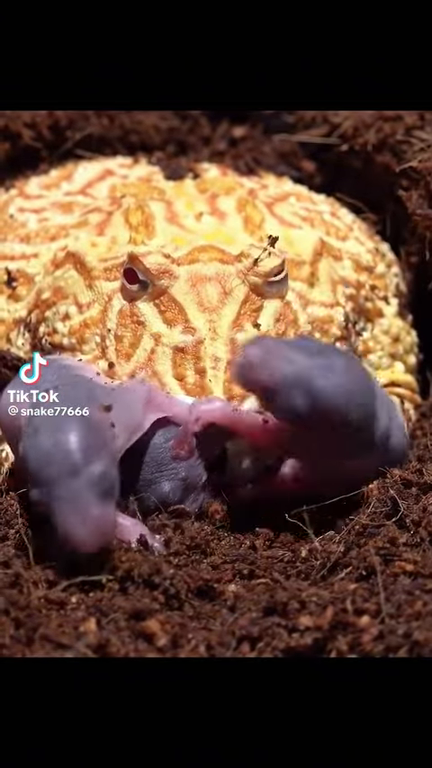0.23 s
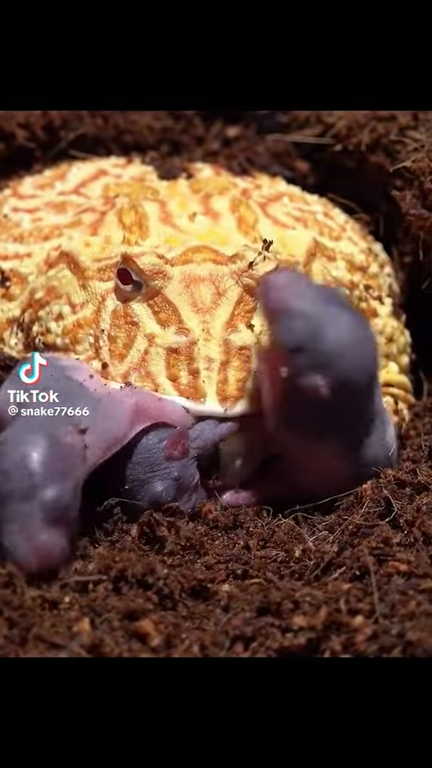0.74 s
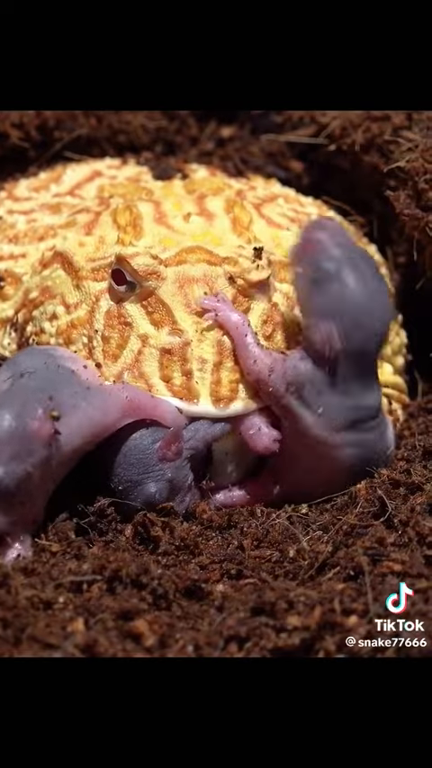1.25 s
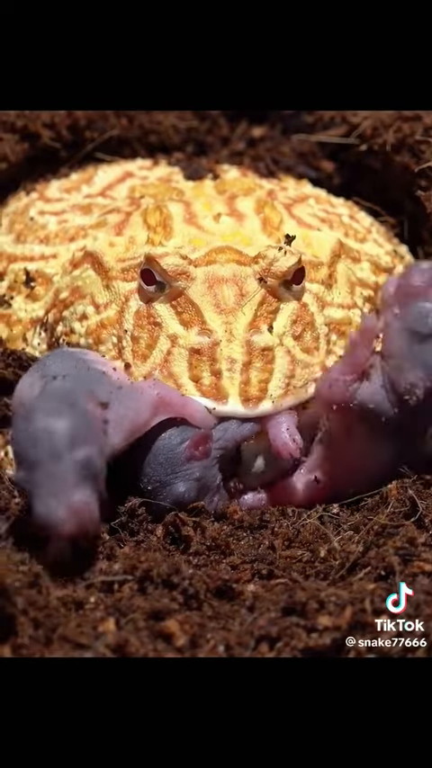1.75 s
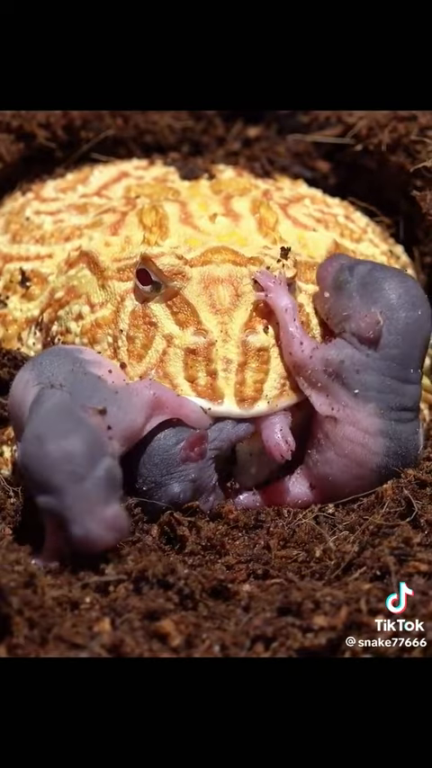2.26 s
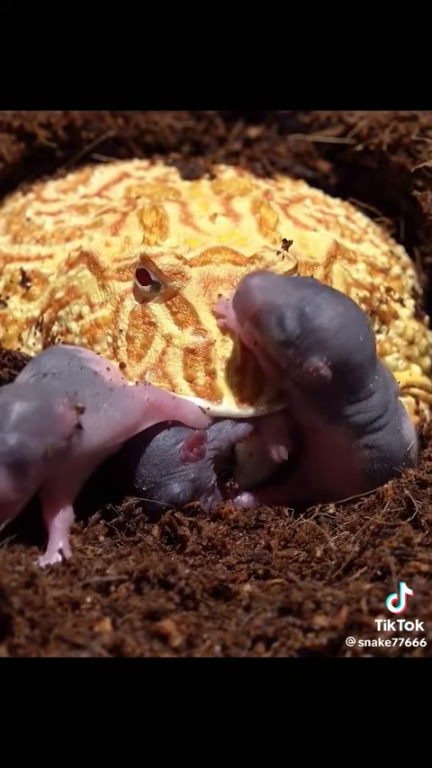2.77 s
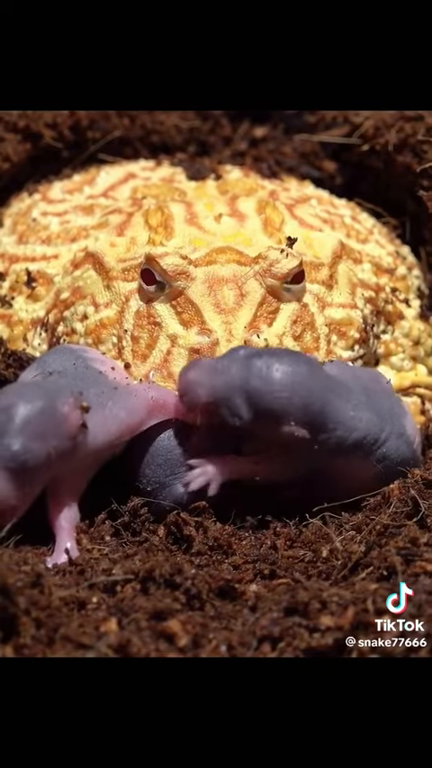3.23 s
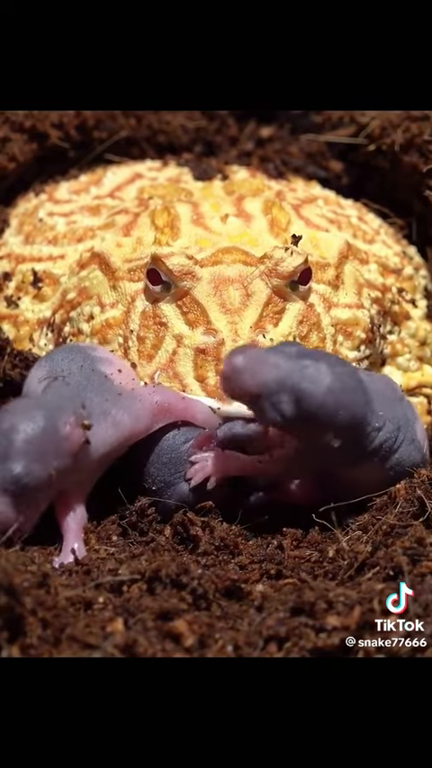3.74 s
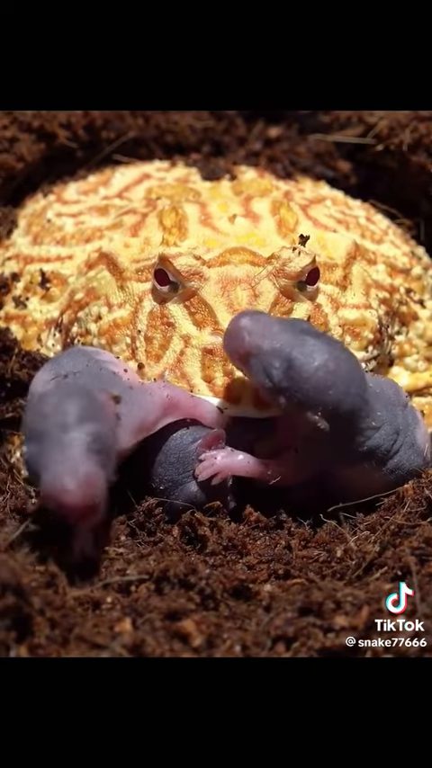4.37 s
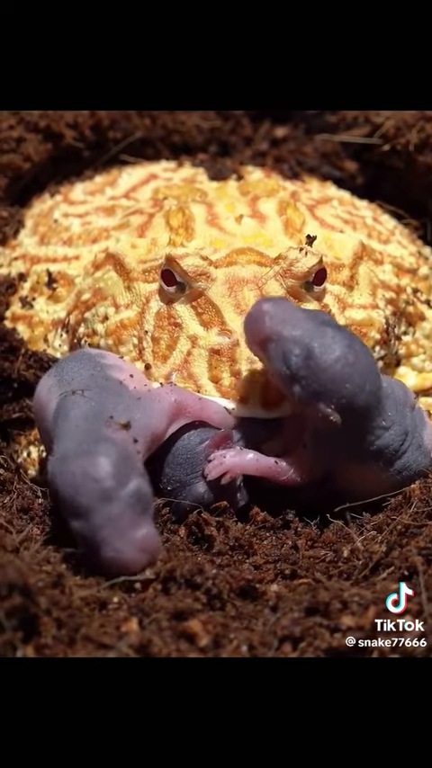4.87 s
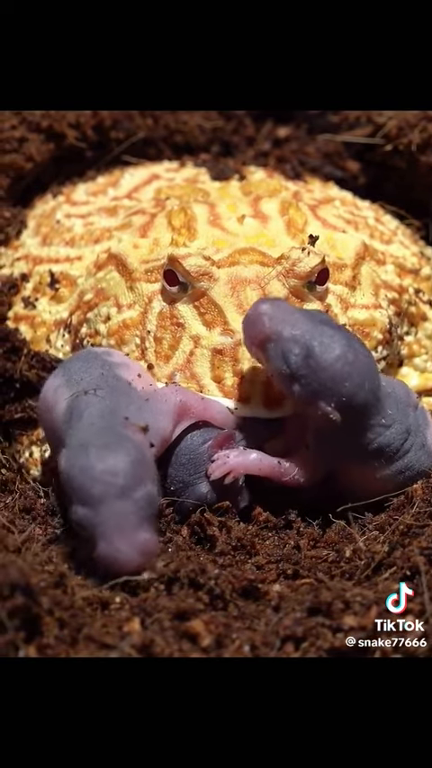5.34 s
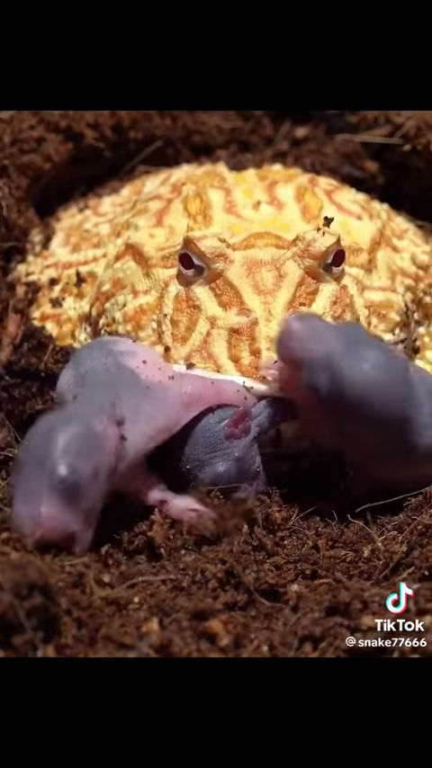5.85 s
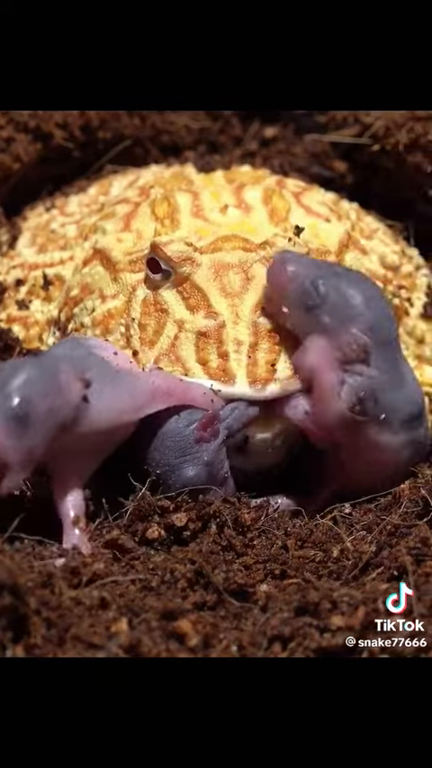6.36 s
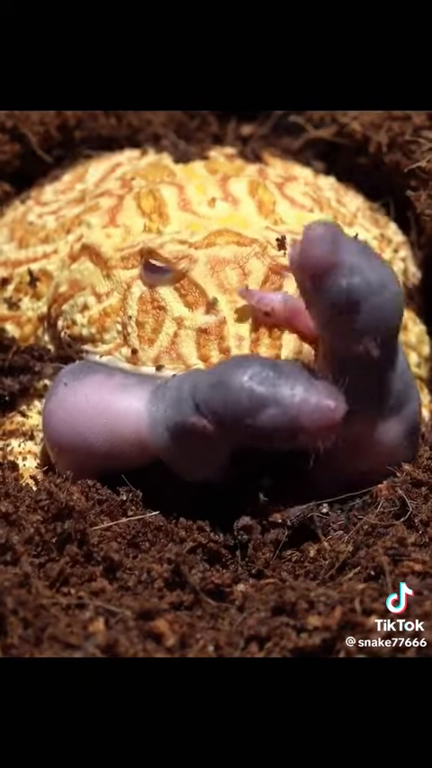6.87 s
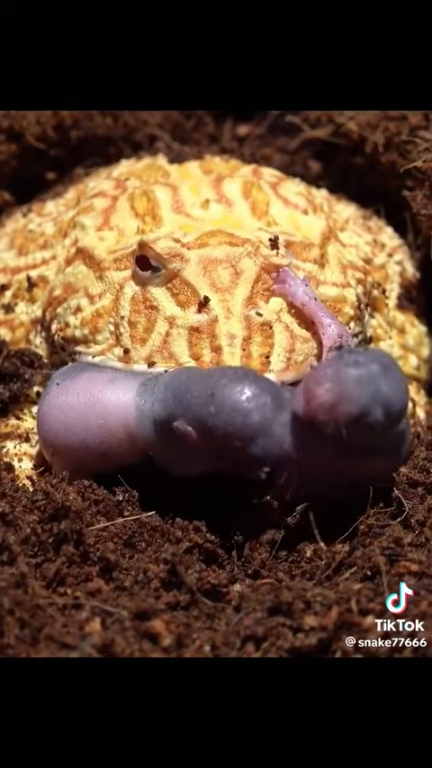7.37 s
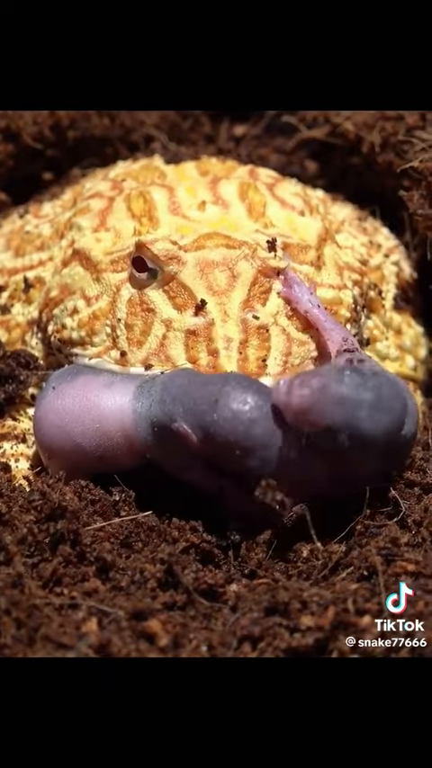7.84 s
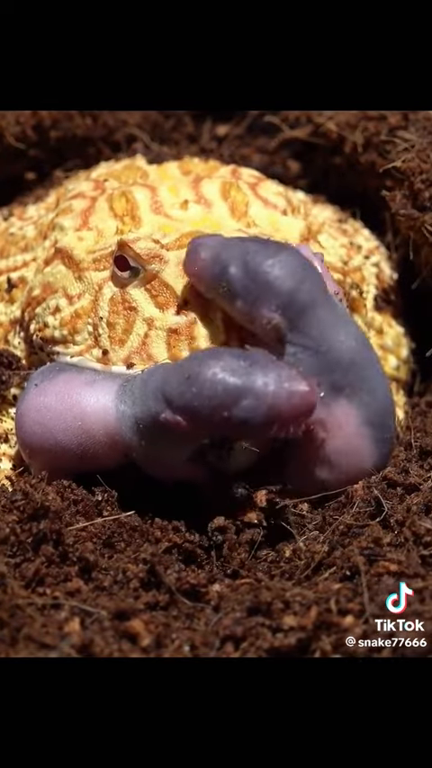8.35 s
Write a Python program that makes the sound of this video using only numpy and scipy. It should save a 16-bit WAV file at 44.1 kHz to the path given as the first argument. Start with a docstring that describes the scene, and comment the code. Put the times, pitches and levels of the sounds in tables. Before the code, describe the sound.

Tiny hairless pups shriek in high jittery cries with raspy breaks, while a shrill cricket-like whine throbs steadily behind in a quiet enclosure.

```python
"""In a terrarium, newborn mice squeal in front of a big frog that lunges once through the soil.
Each squeal is a stack of jittering overtones shaped by throat and mouth: rough when low, a clear whistle when high.
Squeals often break into a hiss of noise with scraps of croak; a second pup joins in, and thin peeps follow some cries.
Two swelling bands of noise make a thin pulsing whine, like a box of feeder crickets.
Sine tones make the hum and drone of appliances, and soft noise fills the room."""
import sys
import numpy as np
from scipy import signal
from scipy.fft import rfft, irfft
from scipy.io import wavfile
from scipy.ndimage import map_coordinates

SR = 44100
rng = np.random.default_rng(int(sys.argv[2]) if len(sys.argv) > 2 else 0)


def transcribe(signal):
    """Save signal, clipped to [-1, 1], as a 16-bit WAV file at the path in sys.argv[1]."""
    frames = np.atleast_2d(signal).T
    limited = np.clip(frames, -1, 1)
    pcm = np.round(limited * 32767).astype(np.int16)
    wavfile.write(sys.argv[1], SR, pcm)


N = 379701   # length in samples
TIME = np.arange(N) / SR
FREQS = np.arange(N // 2 + 1) * SR / N
CUTOFF_HZ = 15750
HOARSE_JITTER = 0.017   # pitch jitter of a fully hoarse voice, as a share of the pitch


def from_db(db):
    """Turn decibels into a factor."""
    return 10 ** (np.asarray(db) / 20)


def rms_one(x):
    """Scale a sound to an rms of 1."""
    return x / np.sqrt(np.mean(x ** 2) + 1e-20)


def in_time(rows, t=TIME):
    """Read the columns of a curve at times t, along straight lines between its rows."""
    s, *columns = np.transpose(rows)
    return [np.interp(t, s, column) for column in columns]


def at_hz(points, hz):
    """Read a spectrum in dB on a log-frequency axis."""
    f, db = np.transpose(points)
    return np.interp(np.log(hz + 1e-9), np.log(f), db)


def noise(gain):
    """Noise with the given relative gain at each frequency; rms 1."""
    spectrum = rfft(rng.standard_normal(N)) * gain
    return rms_one(irfft(spectrum, N))


def drift(rate, t=TIME):
    """A smooth random wander that turns about rate times a second; spread near 1."""
    knots = rng.standard_normal(2 ** 13)
    return map_coordinates(knots, [(t - t[0]) * rate], order=2, mode="wrap")


def gate(t, start, end, rise, fall):
    """Open from start to end, with sloping flanks that are half open at those moments."""
    opening = np.clip((t - start) / rise + .5, 0, 1)
    closing = np.clip((end - t) / fall + .5, 0, 1)
    return opening * closing


def stretch(start, end):
    """The samples of one call, their times, its fade in and out, and its progress from -1 to 1."""
    fade = gate(TIME, start, end, .006, .014)
    at = fade > 0
    t = TIME[at]
    return at, t, fade[at], np.interp(t, [start, end], [-1, 1])


def rasp_of(pitch, clear_hz=3550, span_hz=1100):
    """Slack folds vibrate unevenly, tight ones whistle: 1 rough, 0 clear."""
    return np.clip((clear_hz - pitch) / span_hz, 0, 1)


def harmonics(t, pitch, jitter, rough_jitter, mouth_db=13, wander=0.0032, shimmer_db=1.9, wobble_db=2.5,
              mouth_width_hz=560, count=6):
    """The partials of jittering folds, and the gain that throat and mouth give to each."""
    # How strongly the throat passes each frequency. Each row: frequency in Hz, gain in dB.
    throat = [(1500, -30), (2200, -17.5), (3000, -20), (3750, -6.5), (4300, -15.5), (4800, -6.5),
              (6500, -10), (7800, -5), (11000, -7.5), (12100, -21), (13100, -16.5)]
    # Where the mouth resonates sharply. Each row: time in seconds, frequency in Hz.
    mouth = [(6.52, 9400), (6.56, 9000), (6.65, 9370), (6.96, 6460), (7.15, 6850), (7.43, 8050)]
    rasp = rasp_of(pitch)
    unsteady = wander * drift(150, t) + (jitter + rough_jitter * rasp) * drift(1700, t)
    phase = 2 * np.pi * np.cumsum(pitch * (1 + unsteady)) / SR
    k = np.arange(1, count + 1)[:, None]
    partial_hz = k * pitch
    mouth_hz, = in_time(mouth, t)
    mouth_boost_db = mouth_db / (1 + ((partial_hz - mouth_hz) / mouth_width_hz) ** 2)
    gain = from_db(at_hz(throat, partial_hz) + mouth_boost_db)
    # each partial wobbles in level on its own, and splinters when the folds are slack or hoarse
    splinter = np.minimum(rasp + (jitter / .011) ** 2, 1.5)
    swing_db = np.array([wobble_db * drift(70, t) + shimmer_db * splinter * drift(600, t) for _ in k])
    partials = np.sqrt(2) * np.sin(k * phase) * from_db(swing_db)
    return partials, gain * (partial_hz < CUTOFF_HZ)


def blend(partials, gain):
    """Sum the partials to an rms near 1."""
    return (partials * gain).sum(0) / np.sqrt((gain ** 2).sum(0) + 1e-20)


def scooped(t, start, end, held, slack_share=0.44, bend_power=1.8):
    """Pitch and slackness 0-1: folds tighten up to the held pitch, and slacken if the squeal outlasts it."""
    pitch, = in_time(held, t)
    first_s, last_s = held[0][0], held[-1][0]
    scoop = (first_s - t) / max(first_s - start, .02)
    drop = (t - last_s) / max(end - last_s, .02)
    slack = np.clip(np.maximum(scoop, drop), 0, 1) ** bend_power
    # fully slack folds vibrate at slack_share of the held pitch
    return pitch * (1 - (1 - slack_share) * slack), slack


def pup(air, leak_db=-7, slack_loss_db=9, slack_jitter=0.013, rough_share=1.6, puff_db=-38,
        puff_lead_s=0.0096, puff_s=0.037, tremble_db=3.5, doubling_db=-3):
    """The near pup: partials flare as they glide through resonances, and slack folds leak air."""
    # The squeals. Each row: start and end in seconds, strength of the fundamental and of the overtones in dB
    # (before throat and mouth shape them), swell from start to end in dB, pitch jitter as a share of the pitch.
    squeals = [ (0.0, 0.434, -32.5, -36, 3.5, 0.016), (0.448, 0.799, -33, -35.5, 8, 0.014),
               (1.042, 1.289, -31, -30.5, 5.5, 0.0094), (1.388, 1.618, -31.5, -41, -1, 0.014),
               (1.703, 2.221, -28.5, -42, 14, 0.01), (2.44, 2.804, -27, -34, -3, 0.0036),
               (3.197, 3.613, -27, -32, -3, 0.0056), (3.612, 3.658, -31.5, -37.5, 4, 0.013),
               (4.038, 4.42, -25.5, -29, 0, 0.00087), (4.415, 4.505, -26.5, -33.5, 9, 0.0077),
               (4.792, 5.16, -24.5, -30.5, -2, 0.0025), (5.549, 5.785, -26, -31.5, 0, 0.0089),
               (6.117, 6.469, -27.5, -33, -1.5, 0.0034), (6.466, 6.626, -25, -24.5, 19.5, 0.0098),
               (6.962, 7.145, -25.5, -29, 4.5, 0.0066), (7.429, 7.473, -23, -29.5, 3.5, 0.0055), ]
    # The pitch that each squeal holds, one list per squeal. Each row: time in seconds, pitch in Hz.
    held_pitches = [
        [(0.0, 2840), (0.033, 3695), (0.116, 3273), (0.211, 3710), (0.372, 3633), (0.43, 3330)],
        [(0.445, 3030), (0.512, 3625), (0.564, 3134), (0.62, 3906), (0.729, 3160), (0.772, 2730), (0.802, 3640)],
        [(1.14, 4084), (1.24, 3464)],
        [(1.392, 3110), (1.43, 3890), (1.535, 3850), (1.58, 3290)],
        [(1.71, 2810), (1.755, 3360), (1.81, 3445), (1.86, 3736), (2.018, 3478), (2.084, 3506), (2.11, 3160),
         (2.235, 2695)],
        [(2.54, 3910), (2.63, 3570), (2.69, 3758), (2.795, 3626)],
        [(3.26, 3630), (3.334, 3827), (3.433, 3706), (3.481, 3205), (3.62, 3413)],
        [(3.617, 2165), (3.632, 1462), (3.655, 2430)],
        [(4.075, 3240), (4.104, 3160), (4.126, 3657), (4.264, 3560), (4.306, 3415), (4.414, 3370)],
        [(4.416, 2326), (4.445, 2290)],
        [(4.85, 3700), (4.922, 4115), (5.016, 3336), (5.108, 3588), (5.16, 3516)],
        [(5.547, 1912), (5.59, 1772), (5.641, 2350), (5.651, 3060), (5.727, 3122), (5.743, 2032), (5.803, 1938)],
        [(6.19, 2700), (6.222, 2610), (6.238, 1998), (6.313, 2410), (6.409, 2220), (6.428, 2810), (6.445, 2800)],
        [(6.472, 1974), (6.508, 2163), (6.55, 4560), (6.57, 4270), (6.597, 4240), (6.629, 4445)],
        [(6.988, 3390), (7.029, 3145), (7.069, 3384), (7.107, 3253), (7.117, 4017), (7.15, 4060)],
        [(7.44, 2895), (7.48, 3275)],
    ]
    # When the folds double their period, so tones appear between the partials. Each row: start, end in seconds.
    doublings = [(2.76, 3.1), (5.133, 5.165)]
    out = np.zeros(N)
    doubled = sum(gate(TIME, start, end, .005, .005) for start, end in doublings)
    for (start, end, low_db, high_db, swell_db, jitter), held in zip(squeals, held_pitches):
        at, t, fade, progress = stretch(start, end)
        pitch, slack = scooped(t, start, end, held)
        partials, gain = harmonics(t, pitch, jitter, rough_share * jitter + slack_jitter * slack)
        voice = partials * gain * from_db(-slack_loss_db * slack)
        # odd partials of half the pitch lie between the main ones
        partials, gain = harmonics(t, pitch / 2, jitter, HOARSE_JITTER)
        between = doubled[at] * from_db(doubling_db) * (partials * gain)[::2].sum(0)
        hoarse = jitter / HOARSE_JITTER   # hoarse squeals leak more air and tremble more
        leak = air[at] * from_db(leak_db) * rasp_of(pitch) ** 2 * hoarse
        effort = fade * from_db(swell_db * progress / 2 + tremble_db * hoarse * drift(110.3, t))
        overtones = voice[1:].sum(0) + between + leak
        out[at] += effort * (from_db(low_db) * voice[0] + from_db(high_db) * overtones)
        # if the folds start slack, a puff of air escapes around the moment they begin to sound
        at, t, fade, _ = stretch(start - puff_lead_s, end)
        puff = air[at] * from_db(puff_db) * np.exp(-np.abs(t - start) / puff_s)
        out[at] += slack[0] * fade * puff
    return out


def whine(low_hz=6350, high_hz=7000, width_hz=430, low_db=-2.5, high_db=-5, low_swell_db=7, high_swell_db=5,
          lag_cycles=0.45):
    """A blurred chorus of two shrill noise bands; each swell starts in the lower and climbs to the upper."""
    # Swells, evenly spread between these moments. Each row: time in seconds, number of swells since the last row.
    swell_counts = [(0, 0), (1.45, 10), (2.28, 6), (3.12, 6), (4.66, 10), (6.07, 9), (7.97, 13), (8.64, 6)]
    # Loudness before the swells and reflections. Each row: time in seconds, level in dB.
    loudness = [(1.3, -57), (2.3, -51.5), (7.85, -50.5), (8.2, -55)]
    s, swells = np.transpose(swell_counts)
    cycle = np.interp(TIME, s, np.cumsum(swells))
    low, high = (noise(1 / (1 + ((FREQS - hz) / width_hz) ** 4)) for hz in (low_hz, high_hz))
    level_db, = in_time(loudness)
    low_swing_db = low_swell_db * np.cos(2 * np.pi * cycle)
    high_swing_db = high_swell_db * np.cos(2 * np.pi * (cycle - lag_cycles))
    chorus = low * from_db(low_db + low_swing_db) + high * from_db(high_db + high_swing_db)
    return from_db(level_db) * chorus


def appliances(drone_on_s=1.92, drone_off_s=7.92):
    """Sine tones: a lasting hum that wavers in level, and a motor's deep drone that switches on and off."""
    # The tones of the hum. Each row: frequency in Hz, middle level in dB.
    hum_tones = [(177.6, -75), (355.3, -69.5), (592.2, -75)]
    # The tones of the drone. Each row: frequency in Hz, level in dB.
    drone_tones = [(32.3, -53), (59.2, -54)]
    hum = sum(from_db(db + drift(12)) * np.sin(2 * np.pi * hz * TIME) for hz, db in hum_tones)
    drone = sum(from_db(db) * np.sin(2 * np.pi * hz * TIME) for hz, db in drone_tones)
    running = gate(TIME, drone_on_s, drone_off_s, 0.019, 0.027)
    return np.sqrt(2) * (hum + drone * running)   # root 2 makes the levels rms


def room_noise(level_db=-57.5, side_db=-3, wide_hz=220):
    """Soft noise, nearly alike on both sides in the bass and wider above."""
    # The colour of the room noise. Each row: frequency in Hz, relative strength in dB.
    room_spectrum = [(55, 7.5), (130, -8), (900, -9.5), (12000, -22)]
    colour = from_db(at_hz(room_spectrum, FREQS))
    middle = noise(colour)
    side = from_db(side_db) * noise(colour * FREQS / (FREQS + wide_hz))
    return from_db(level_db) * (middle + side * np.array([[1], [-1]]))


def sibling(air, air_db=-9, arch_power=2.6, flutter_db=3.5):
    """The second pup cries lower and hoarser, in quavering arches of pitch mixed with air."""
    # The cries, one arch each. Each row: start and end in seconds, first, top and last pitch in Hz,
    # strength of the fundamental and of the overtones in dB (before throat and mouth shape them).
    cries = [ (0.156, 0.332, 2400, 3200, 2246, -32, -37.5), (0.333, 0.35, 2310, 3430, 3320, -29, -40),
             (0.546, 0.683, 3025, 3364, 3110, -33, -35), (1.044, 1.284, 2270, 3737, 2520, -31.5, -48.5),
             (1.441, 1.564, 2040, 2650, 2350, -32, -44), (1.791, 1.91, 3160, 3345, 2770, -34.5, -37.5),
             (2.034, 2.115, 1820, 3300, 3010, -28, -39.5), (5.562, 5.646, 1690, 1735, 1600, -34, -42), ]
    out = np.zeros(N)
    for start, end, first_hz, top_hz, last_hz, low_db, high_db in cries:
        at, t, fade, progress = stretch(start, end)
        edge_hz = np.where(progress < 0, first_hz, last_hz)
        pitch = top_hz + (edge_hz - top_hz) * np.abs(progress) ** arch_power
        quavering = pitch * (1 + HOARSE_JITTER * drift(70, t))
        partials, gain = harmonics(t, quavering, HOARSE_JITTER, HOARSE_JITTER, count=5)
        voice = partials * gain * from_db(flutter_db * drift(170, t))
        overtones = voice[1:].sum(0) + from_db(air_db) * air[at]
        out[at] += fade * (from_db(low_db) * voice[0] + from_db(high_db) * overtones)
    return out


def hisses(air, croak_hz=1850, croak_db=3, sag_db_per_s=18, release_s=.02):
    """Air forced through open, chaotically flapping folds: scraps of croak in a hiss that dies away."""
    # When the voice breaks. Each row: start and end in seconds, starting level of the air in dB.
    breaks = [(0.419, 0.448, -39.5), (0.893, 0.903, -43.5), (1.223, 1.277, -43), (1.562, 1.676, -40),
              (2.137, 2.173, -35.5), (2.784, 2.979, -35), (4.476, 4.546, -38), (5.151, 5.318, -35),
              (5.785, 5.792, -35.5), (6.617, 6.628, -34.5), (7.142, 7.167, -39.5), (7.47, 7.528, -35.5)]
    out = np.zeros(N)
    for start, end, db in breaks:
        at = (TIME > start) & (TIME < end + 10 * release_s)
        t = TIME[at]
        effort = np.minimum((t - start) / .008, 1) * np.exp(-np.maximum(t - end, 0) / release_s)
        croak = 0
        for _ in range(2):   # two ways of flapping come and go independently
            wandering_hz = croak_hz * np.exp(.09 * drift(30, t))
            partials, gain = harmonics(t, wandering_hz, .008, .008, mouth_db=7, count=5)
            presence = np.clip(.5 + drift(70, t), 0, 1)
            croak = croak + blend(partials, gain) * presence
        level_db = db - sag_db_per_s * (t - start)
        out[at] += effort * from_db(level_db) * (air[at] + from_db(croak_db) * croak / 2)
    return out


def peeps():
    """Short, nearly pure whistles; the last is the room ringing on after a squeal."""
    # Thin whistles after some squeals. Each row: start and length in seconds, first and last pitch in Hz,
    # level in dB before its fade and wobble.
    whistles = [(3.656, 0.013, 3700, 4470, -35.5), (4.551, 0.012, 5200, 4700, -33),
                (5.79, 0.034, 3750, 4000, -38), (5.908, 0.018, 4050, 3290, -44),
                (7.148, 0.037, 4094, 4060, -42)]
    out = np.zeros(N)
    for start, length, first_hz, last_hz, level_db in whistles:
        at, t, fade, progress = stretch(start, start + length)
        pitch = np.interp(progress, [-1, 1], [first_hz, last_hz])
        partials, _ = harmonics(t, pitch, .006, 0, count=1)
        out[at] += fade * from_db(level_db) * partials[0]
    return out


def lunge(start_s=6.44, level_db=-48, decay_s=0.056, edge_hz=1500):
    """A short scuff of dull noise that starts at once and dies away, as the frog shoves the soil."""
    crumbs = noise(FREQS / (FREQS + edge_hz / 10) / (1 + (FREQS / edge_hz) ** 2))
    return from_db(level_db) * crumbs * (TIME >= start_s) * np.exp(-np.abs(TIME - start_s) / decay_s)


def terrarium(x, walls_db=-10, walls_t60=0.18, tail_db=-17, tail_t60=0.423, tail_edge_hz=5000):
    """Add quick wall reflections and a faint, duller room tail: fading noise, different for each ear."""
    t = TIME[:SR // 2]

    def echoes(db, t60):
        """Noise that falls by 60 dB in t60 seconds, scaled so that its total energy is set by db."""
        fading = rng.standard_normal((2, len(t))) * np.exp(-np.log(1000) * t / t60)
        return from_db(db) * rms_one(fading) / np.sqrt(len(t))

    walls, tail = echoes(walls_db, walls_t60), echoes(tail_db, tail_t60)
    dull = signal.butter(2, tail_edge_hz, fs=SR, output="sos")
    response = walls + signal.sosfilt(dull, tail)
    return x + signal.fftconvolve(x[None], response, axes=1)[:, :N]


def scene(sway_db=2.0, sways_per_s=18):
    """The voices and the scuff shift between left and right; all other sounds keep their place."""
    # The colour of air through the throat. Each row: frequency in Hz, relative strength in dB.
    air_spectrum = [(1100, -20.5), (2300, -14), (3900, -4.5), (6200, -11.5), (9300, 2.5), (11200, -16),
                    (12200, -16.5)]
    # Where the voices sit before the random sway. Each row: time in seconds, left minus right in dB.
    place = [(.7, 1.4), (1.2, 0), (5.35, .2), (5.55, 6.5), (6.3, 4), (6.55, -1.4), (7.0, 0)]
    bass_loss = np.minimum(FREQS / air_spectrum[0][0], 1) ** 2   # a tiny mouth radiates little bass
    air_colour = from_db(at_hz(air_spectrum, FREQS)) * bass_loss
    near = pup(noise(air_colour)) + sibling(noise(air_colour)) + hisses(noise(air_colour))
    near = near + peeps() + lunge()
    # the left-right balance wanders at random
    pan_db = in_time(place)[0] + sway_db * drift(sways_per_s)
    panned = terrarium(near) * from_db([pan_db / 2, -pan_db / 2])
    return panned + terrarium(whine()) + appliances() + room_noise()


def record(dry):
    """A steep low-pass filter cuts off the top."""
    steep = signal.ellip(12, .1, 90, CUTOFF_HZ, fs=SR, output="sos")
    return signal.sosfilt(steep, dry)


dry = scene()
out = record(dry)
transcribe(out)
```